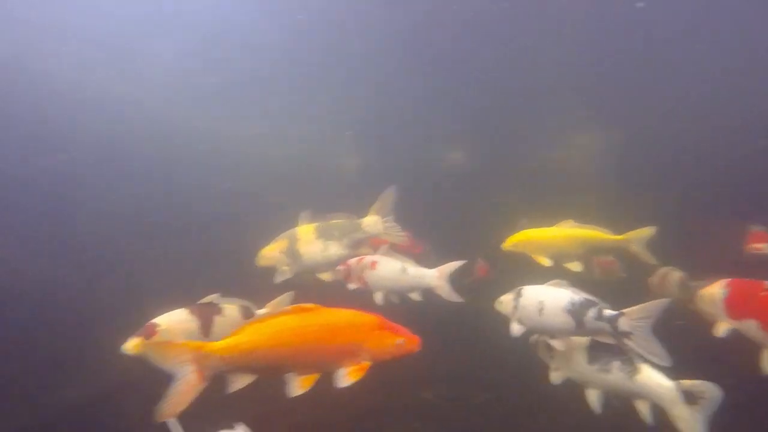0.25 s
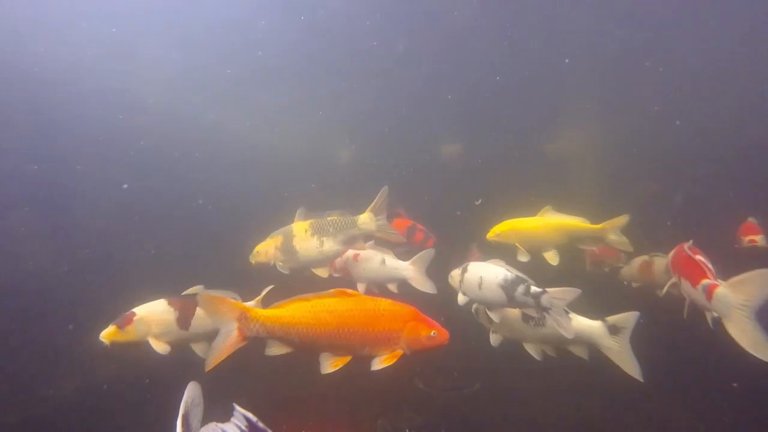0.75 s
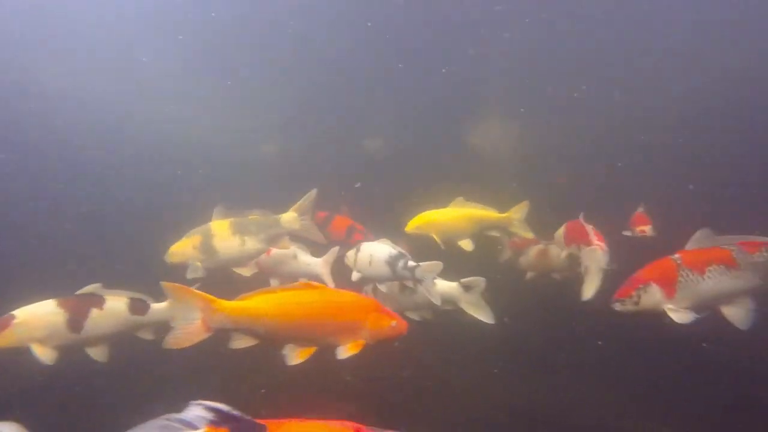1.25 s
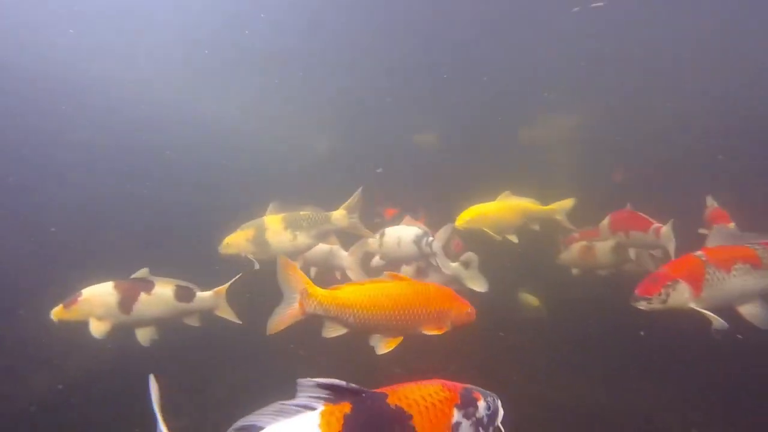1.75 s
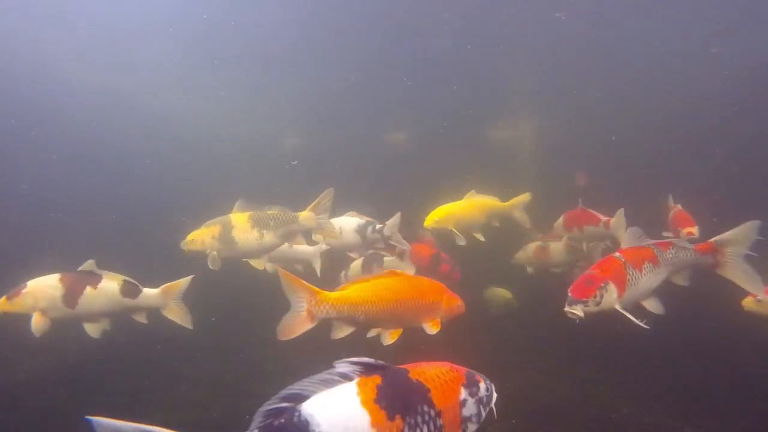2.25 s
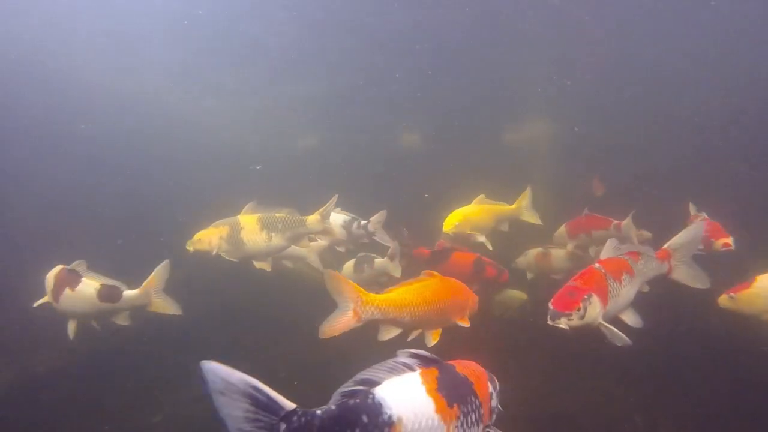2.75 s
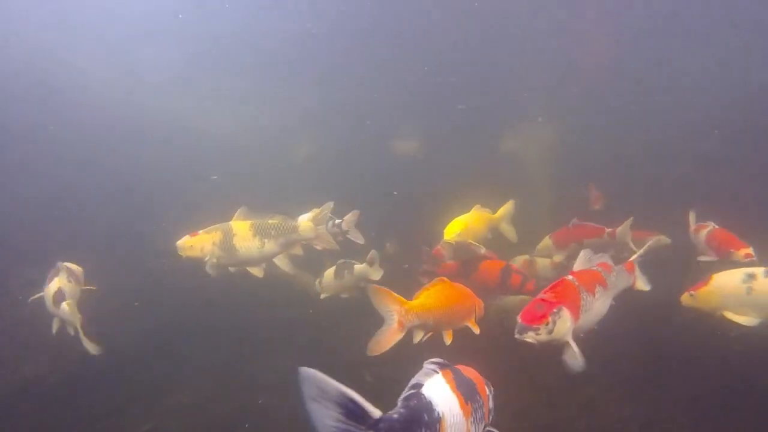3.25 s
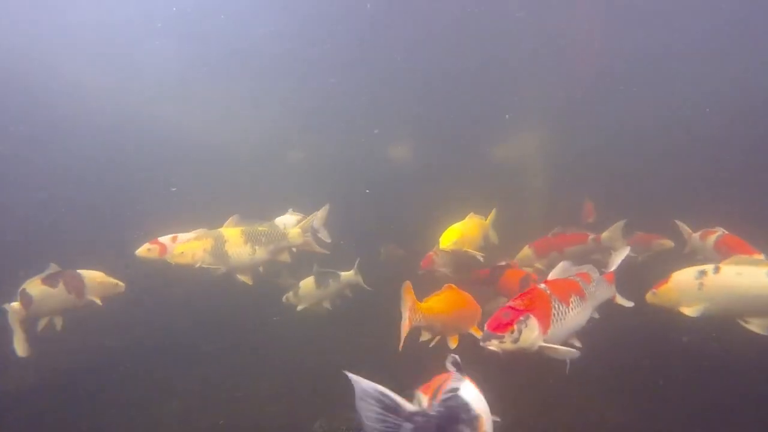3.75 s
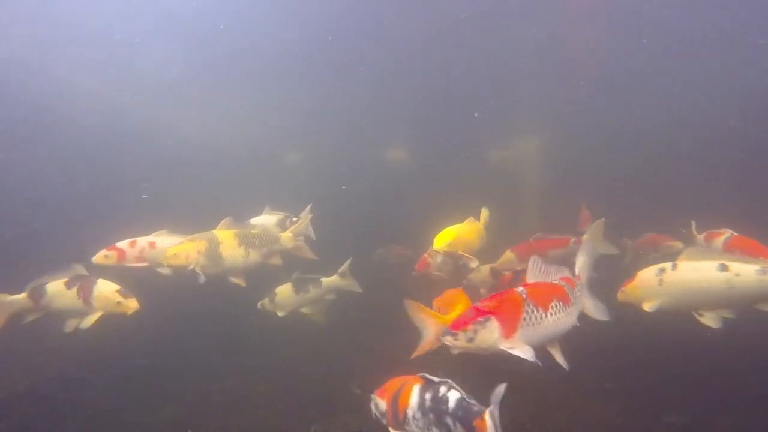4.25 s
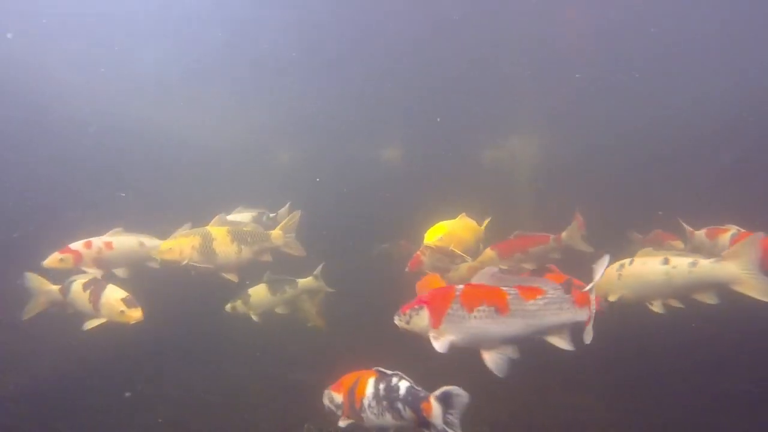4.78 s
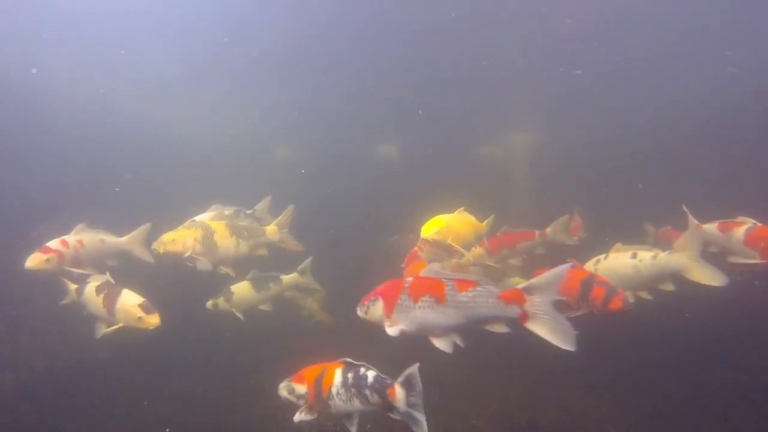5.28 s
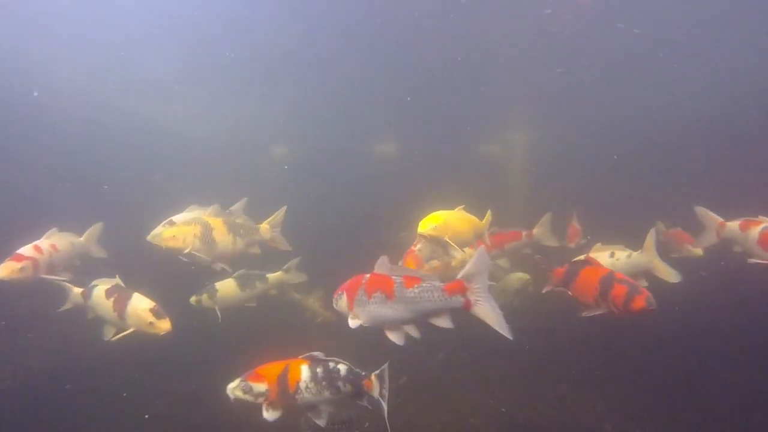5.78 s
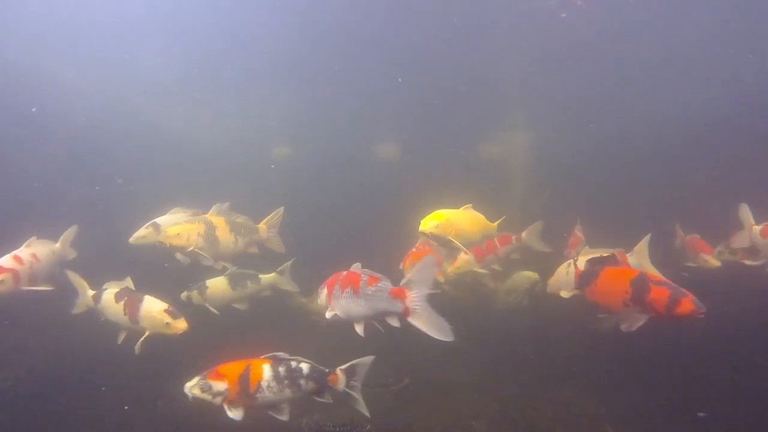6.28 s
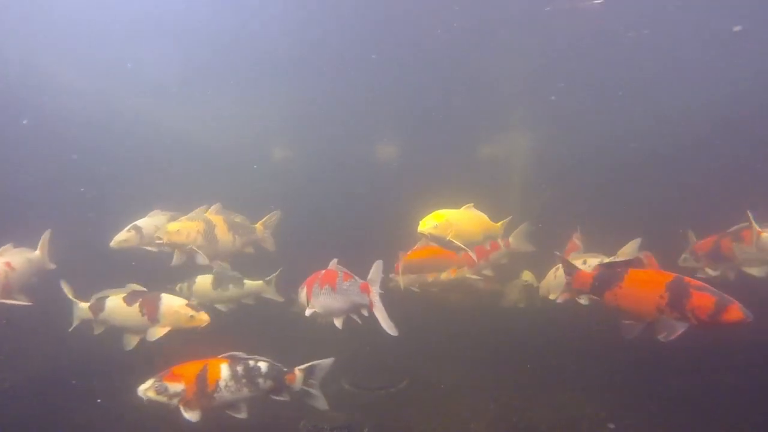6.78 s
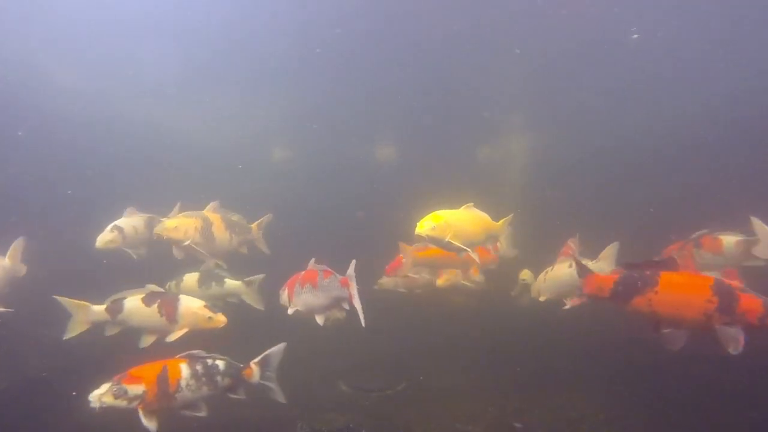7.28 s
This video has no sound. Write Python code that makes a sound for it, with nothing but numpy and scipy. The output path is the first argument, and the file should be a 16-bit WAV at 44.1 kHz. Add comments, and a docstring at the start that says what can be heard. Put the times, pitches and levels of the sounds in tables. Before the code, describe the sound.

Heard from inside a sealed case underwater in a koi pond: a hand moves the mount, giving deep sway, shudder and hard muffled knocks for about two and a half seconds. Then it lets go, leaving low watery rumble, a pump's mains hum, frequent hollow bubble plops, deeper filter gulps and tiny dry ticks. The fish make no distinct sound.

```python
"""Knocks, sway and shudder open the scene as a hand shifts a sealed case on its mount in a fish pond; after
under three seconds the hand lets go and rumble, mains hum, bubbles and small ticks carry on, heard inside the case.
Water is filtered noise, some of it through resonances of case and pond; the hum and a faint whine are steady sines.
Bubbles and knocks are decaying sines, ticks are short noise bursts, and the moving mount is narrow noise that
follows the hand."""
import sys
import numpy as np
from scipy import signal
from scipy.fft import next_fast_len
from scipy.io import wavfile

SR = 44100
rng = np.random.default_rng(int(sys.argv[2]) if len(sys.argv) > 2 else 0)


def bounce(signal):
    """Save signal as a 16-bit WAV file at the path given by the first command-line argument."""
    frames = np.transpose(np.atleast_2d(signal))
    limited = np.clip(frames, -1, 1)
    pcm = np.round(limited * 32767).astype(np.int16)
    wavfile.write(sys.argv[1], SR, pcm)


N = 332072

# Spectrum of the broad water noise. Each row: frequency in Hz, relative density in dB per Hz.
WATER_SPECTRUM = [(15, -3), (60, -6), (130, -11), (400, -21), (1200, -37.5), (1650, -64), (3000, -44),
                  (5000, -49.5), (9500, -56.5), (10500, -70), (12500, -61), (14000, -77)]
WATER_RMS_DB = -41

# Resonances of case and pond, excited by the water.
# Each row: centre in Hz, width in Hz, rms level in dB before it wavers.
WATER_RESONANCES = [(26.5, 13, -63), (96, 35, -41.5), (170.2, 45, -43.5), (217.7, 32, -51),
                    (307, 65, -53.5), (504, 94, -53), (596.7, 115, -43.5), (818.2, 61, -54.5),
                    (938, 175, -58), (1320.5, 66, -62.5), (1470, 190, -65.5), (1861, 170, -58),
                    (2014, 108, -59.5), (2346, 470, -68.5), (3480, 520, -75), (5725, 300, -80)]
GURGLE_JOLTS_PER_S, GURGLE_SHARE = 100, 0.42
PITCH_WANDER_SHARE, PITCH_WANDER_TOP_HZ = .02, 1100

# Hum of the pump motor. Each row: multiple of the mains frequency, rms level in dB before it wavers.
HUM_HARMONICS = [(2, -55), (4, -56), (6, -65), (8, -63), (9, -59), (10, -50), (11, -62)]
MAINS_HZ = 59.98

# Faint electronic whine: a list of tone frequencies in Hz.
WHINE_TONES_HZ = [9590, 9620, 9650]
# Levels of those tones. Each row: early rms level in dB, late rms level in dB.
WHINE_LEVELS = [(-94, -104), (-104, -92), (-86, -93)]
WHINE_SHIFT_S = 3.2

# Single clear bubbles. Each row: start in seconds, level in dB before rise and decay, pitch in Hz.
CLEAR_BUBBLES = [(0.1033, -27.5, 612), (0.1172, -38, 834), (0.144, -26, 581), (0.282, -22, 628),
                 (0.3615, -26, 599), (0.3987, -28, 580), (0.4809, -46.5, 3550), (0.618, -27, 598),
                 (0.735, -43, 2080), (0.8196, -50, 5870), (0.8339, -28.5, 608), (0.864, -57, 3970),
                 (0.882, -38, 2050), (0.9708, -24, 547), (1.1479, -58, 6000), (1.2796, -48, 6720),
                 (1.8268, -18.5, 574), (1.8486, -23, 585), (1.8653, -29.5, 833), (2.032, -22.5, 586),
                 (2.0806, -33.5, 1910), (2.2004, -27, 601), (2.2265, -32, 645), (2.2843, -52, 3560),
                 (2.5926, -37, 2600), (2.9049, -23.5, 637), (2.9937, -34.5, 855), (3.0577, -37, 2550),
                 (3.0705, -31, 916), (3.309, -34, 827), (3.889, -30.5, 599), (3.9078, -27, 629),
                 (4.0319, -33, 988), (4.187, -34.5, 855), (4.2653, -53, 3400), (4.3256, -39.5, 1805),
                 (4.3292, -29, 662), (4.3646, -23.5, 659), (4.4168, -23, 555), (4.452, -33, 834),
                 (4.4723, -30, 643), (4.4993, -44, 3470), (4.502, -45, 3130), (4.7013, -48.5, 3630),
                 (4.701, -27, 599), (4.72, -24.5, 624), (4.753, -22.5, 631), (4.9133, -31, 708),
                 (4.9857, -35, 618), (5.0606, -27, 575), (5.157, -33, 626), (5.1853, -44, 3570),
                 (5.1885, -48, 3930), (5.277, -46, 620), (5.5387, -30.5, 1975), (5.559, -53, 3500),
                 (5.6751, -49, 3500), (5.903, -27, 600), (5.9394, -28, 567), (5.972, -59, 3800),
                 (6.0273, -53, 4700), (6.0493, -47, 3300), (6.0591, -23.5, 581), (6.1861, -30, 617),
                 (6.1929, -26.5, 1906), (6.309, -28, 605), (6.4067, -22, 620), (6.4483, -48, 2850),
                 (6.5825, -49, 3400), (6.7144, -27, 562), (6.9408, -31.5, 1860), (6.9742, -32.5, 1875),
                 (7.1009, -43.5, 2420), (7.1537, -49, 2520), (7.275, -23, 577), (7.476, -29, 807),
                 (7.514, -41.5, 3540)]
# Cycles a bubble rings while falling 60 dB: at 600 Hz, and the change for each octave above or below.
BUBBLE_CYCLES, CYCLES_PER_OCTAVE = 46, 20
FIZZ_PER_S, FIZZ_DB = 70, -69.5  # level before the tilt with pitch and the spread of sizes

# Big bubbles gulping out of the filter.
# Each row: start in seconds, level in dB before rise and decay, pitch in Hz.
FILTER_GULPS = [(2.8, -36, 96.5), (3.029, -28, 106.5), (3.331, -29, 100), (3.502, -23, 169),
                (3.565, -20.5, 171), (3.724, -20.5, 97.7), (3.846, -36, 99), (4.205, -27.5, 103),
                (4.645, -23, 101), (4.69, -25.5, 65), (5.272, -24, 93), (5.715, -25, 107),
                (6.142, -24, 171), (6.55, -29, 92.8), (6.816, -24, 175), (7.283, -39, 91)]
GULP_CYCLES, GULP_RISE_CYCLES = 21, 1.05

# Dry ticks without a pitch. Each row: start in seconds, noise level in dB before rise, decay and filter,
# centre in Hz, width in octaves, time to fall 60 dB in seconds.
DRY_TICKS = [(0.05, -55, 3500, 0.28, 0.039), (0.165, -51, 3500, .3, .025), (0.3143, -44.5, 3200, .3, 0.07),
             (0.408, -50, 2500, .25, 0.033), (0.678, -58, 6900, .4, .015), (2.5835, -56, 7000, .4, .015),
             (2.7892, -45, 4620, 0.48, 0.017), (2.9288, -50, 5900, .5, .015),
             (3.353, -44, 4370, 0.61, 0.025), (4.108, -38.5, 2680, 0.34, 0.039),
             (4.246, -48, 4300, .3, .02), (4.4239, -38, 2520, 0.29, 0.037), (5.549, -52, 6400, .4, .015),
             (5.5853, -50, 6200, 0.52, .015), (5.922, -56, 7500, .3, .015), (5.95, -46, 3000, .5, 0.022),
             (6.1929, -44, 2500, 0.47, 0.022), (6.34, -57, 6800, .5, .015), (6.563, -42, 2900, 0.36, 0.038),
             (6.9764, -38, 2400, 0.36, 0.038)]
TICK_RISE_S = 0.00057
CRACKLE_PER_S, CRACKLE_DB, CRACKLE_T60_S = 32, -63, .015  # level before the spread of sizes

# The hand on the mount. Each row: time in seconds, slow sway in dB, case shudder in dB.
HAND_MOTION = [(0.0,-50,-44), (0.07,-22.5,-55), (0.25,-38,-26), (0.3,-22,-45), (0.39,-32,-44),
               (0.419,-21.5,-24), (0.54,-23.5,-47), (0.6,-50,-62), (0.65,-30.5,-49), (0.7,-45,-46.5),
               (0.77,-40,-58), (0.81,-21.5,-44), (0.89,-34,-38.5), (1.13,-31,-35.5), (1.16,-24,-45),
               (1.19,-25,-33), (1.27,-20.5,-37), (1.32,-24.5,-45), (1.38,-22,-27), (1.45,-33,-29),
               (1.55,-32,-29), (1.58,-31.5,-41), (1.68,-34,-26), (1.71,-29,-48), (1.82,-42,-46),
               (1.89,-28,-53), (1.96,-42,-50), (2.02,-29,-54), (2.16,-46,-43), (2.22,-35.5,-44),
               (2.5,-35,-35.5), (2.57,-55,-52), (2.7,-55,-52)]
SWAY_HZ, SWAY_WIDTH_HZ = 25, 20
SWAY_EVENNESS = .6  # 0 swells at random, 1 swings almost evenly
SHUDDER_HZ, SHUDDER_WIDTH_HZ = 102.3, 33
LET_GO_S = 0.22

# The case slides in its clamp around hard knocks.
# Each row: start in seconds, length in seconds, rms level in dB before it flickers.
CLAMP_RUBS = [(0.247, 0.2, -63.5), (0.81, 0.21, -60.5), (1.32, 0.227, -60)]
RUB_HZ, RUB_WIDTH_HZ, RUB_EDGE_S = 2300, 550, 0.026

# Knocks on the case. Each row: start in seconds, then drive of the thump, knock and crack modes in dB,
# share of the free ring time that the grip leaves.
CASE_KNOCKS = [(0.054, -21, -39, -77, .8), (0.2015, -30, -50, -55, 1.), (0.2075, -20, -45, -66, .7),
               (0.2375, -16, -27, -52, .8), (0.2445, -9, -13, -37, .9), (0.2555, -17, -18, -47, .8),
               (0.471, -19.5, -30, -71, .9), (0.625, -25.5, -28.5, -65, .9), (0.7822, -26, -27, -62, .8),
               (0.7856, -9, -13.5, -34.5, .9), (0.837, -21, -31, -60, .6), (1.138, -20.5, -46, -70, .9),
               (1.224, -19.5, -36, -62, .9), (1.259, -20.5, -38, -70, .9), (1.3392, -24, -32, -64, .8),
               (1.3413, -5, -14, -36, .6), (1.504, -22.5, -38, -74, .9), (1.696, -19.5, -45, -65, .9),
               (2.0036, -9.5, -13, -53, .6), (2.0125, -21, -22, -64, .5), (2.021, -14, -25, -62, .45)]
# What the case rings with. Each row: pitch in Hz, level in dB added to the drive,
# time to fall 60 dB in seconds, rise in seconds.
CASE_RING = [(32.8, -16, 0.52, .0012), (85, -2.5, 0.089, 0.00075), (110.1, 1.5, 0.12, 0.00097),
             (170, -3, 0.023, 0.0024), (250, 1, 0.044, .0008), (375, 6, 0.016, 0.0015),
             (458, 0.5, 0.032, 0.0014), (529, 6, 0.024, 0.00099), (663, 6.5, .021, 0.0012),
             (760, -23.5, 0.01, 0.0021), (1530, 12.5, 0.018, 0.00071), (1890, 12.5, 0.024, 0.0016),
             (2350, 18, 0.015, 0.0012), (3380, -4, .017, 0.00051)]
THUMP_TOP_HZ, KNOCK_TOP_HZ = 220, 1100
GRIT_DB, GRIT_RISE_S, GRIT_T60_S = -6, 0.011, .045

MIC_LOW_HZ, CUTOFF_HZ = 14, 14500


def from_db(db):
    """Turns decibels into an amplitude factor."""
    return 10 ** (np.asarray(db) / 20)


def rms_one(x):
    """Scales a signal to rms 1."""
    return x / np.sqrt(np.mean(x ** 2) + 1e-20)


def drift(rate_hz):
    """Slow random wander of spread 1: noise at a fortieth of the sample rate through two equal low-pass poles."""
    pole = np.exp(-80 * np.pi * rate_hz / SR)
    noise = rng.standard_normal(N // 40 + 2002)
    slow = signal.lfilter([1], [1, -2 * pole, pole * pole], noise)[2000:]
    return np.interp(np.arange(N) / 40, np.arange(len(slow)), rms_one(slow))


def filtered(x, order, hz, kind="low"):
    """Butterworth filter."""
    return signal.sosfilt(signal.butter(order, hz, kind, fs=SR, output="sos"), x)


def resonate(x, hz, width_hz):
    """Two-pole band-pass."""
    radius = np.exp(-np.pi * width_hz / SR)
    poles = [1, -2 * radius * np.cos(2 * np.pi * hz / SR), radius * radius]
    return signal.lfilter([1, 0, -1], poles, x)


def narrow_noise(hz, width_hz, jolt_share=0., wander=0.):
    """Noise and sparse random jolts, twice through one resonance so the skirts stay dark; rms 1."""
    length = N + 2 * SR
    jolts = (rng.random(length) < GURGLE_JOLTS_PER_S / SR) * rng.standard_normal(length)
    smooth = np.sqrt(1 - jolt_share) * rng.standard_normal(length)
    drive = smooth + np.sqrt(jolt_share) * rms_one(jolts)
    still = resonate(resonate(drive, hz, width_hz), hz, width_hz)[SR:]
    # Reading at a wavering speed makes the pitch wander.
    position = np.cumsum(1 + wander * drift(2.5))
    return rms_one(np.interp(position, np.arange(N + SR), still))


def add_ring(out, s, level_db, hz, t60, rise_s, glide=0.):
    """Adds a decaying sine; it starts sharp by about 2.2 times glide and falls to pitch in a few cycles."""
    start = round(s * SR)
    t = np.arange(max(0, min(int(t60 * SR), N - start))) / SR
    turns = hz * t + glide * 3.8 * (1 - np.exp(-hz * t / 1.7))
    envelope = from_db(level_db - 60 * t / t60) * (1 - np.exp(-t / rise_s)) ** 2
    out[start:start + len(t)] += envelope * np.sin(2 * np.pi * turns)


def water():
    """Broad flow noise in half-octave bands that waver in level, the treble least."""
    out = 0
    edges = 14 * 2 ** np.arange(0, 10.6, .5)
    white = rng.standard_normal((2, N + SR))  # neighbouring bands take turns, so they stay independent
    hz, density_db = np.transpose(WATER_SPECTRUM)
    for k, (low, high) in enumerate(zip(edges, edges[1:])):
        band = filtered(white[k % 2], 2, [low, high], "band")[SR:]
        level_db = np.interp(np.log(low * high) / 2, np.log(hz), density_db)
        waver_db = 3.53 * min(1, 2500 / high) * drift(15.3)
        out = out + band * from_db(level_db + waver_db)
    return from_db(WATER_RMS_DB) * rms_one(out)


def resonances():
    """Gurgling water drives each resonance, so its level bubbles up and down; high ones rush more smoothly."""
    out = np.zeros(N)
    surge = drift(17.0)  # shared by all
    for hz, width_hz, level_db in WATER_RESONANCES:
        jolt_share = GURGLE_SHARE * min(1, 1500 / hz)
        wander = PITCH_WANDER_SHARE * (hz < PITCH_WANDER_TOP_HZ)
        waver_db = 0.5 * surge + 1.1 * drift(20.5)
        out += narrow_noise(hz, width_hz, jolt_share, wander) * from_db(level_db + waver_db)
    return out


def tone(hz):
    """Steady sine of rms 1 from a random phase."""
    return np.sqrt(2) * np.sin(2 * np.pi * (hz * np.arange(N) / SR + rng.random()))


def motor_hum():
    """Mains multiples from the pump motor; each wavers as its paths through the water change."""
    return sum(from_db(db + 0.63 * drift(4.6)) * tone(multiple * MAINS_HZ)
               for multiple, db in HUM_HARMONICS)


def electronic_whine():
    """Faint high steady tones whose levels step once."""
    early = np.arange(N) / SR < WHINE_SHIFT_S
    return sum(from_db(np.where(early, early_db, late_db)) * tone(hz)
               for hz, (early_db, late_db) in zip(WHINE_TONES_HZ, WHINE_LEVELS))


def bubbles():
    """Each clear bubble rings with a short snap as it pinches off and a neighbour of slightly other size."""
    out = np.zeros(N)
    for s, level_db, hz in CLEAR_BUBBLES:
        later, other = rng.random(2)
        octaves = np.log2(hz / 600)
        t60 = (BUBBLE_CYCLES + CYCLES_PER_OCTAVE * octaves) / hz
        add_ring(out, s, level_db, hz, t60, rise_s=1.1 / hz, glide=0.015 * (hz / 3000) ** 2)
        # The neighbour follows a few cycles later.
        neighbour_s, neighbour_hz = s + (3 + 6 * later) / hz, hz * (.93 + .14 * other)
        add_ring(out, neighbour_s, level_db - 5, neighbour_hz, t60, rise_s=1.6 / hz)
        # The snap is relatively louder in small, high bubbles.
        add_ring(out, s + .6 / hz, level_db - 10 + 4 * octaves, 1.06 * hz, 12 / hz, rise_s=0.5 / hz)
    return out


def fizz():
    """A random scatter of faint bubbles, the higher ones softer and a few of them standing out."""
    out = np.zeros(N)
    for when, pitch, size in rng.random((int(FIZZ_PER_S * N / SR), 3)):
        hz = 800 * 11 ** pitch
        level_db = FIZZ_DB - 11.5 * np.log2(hz / 3000) - 1.9 * np.log(size + 0.012)
        add_ring(out, when * (N - 2) / SR, level_db, hz, 55 / hz, rise_s=0.87 / hz, glide=0.12 * hz / 3000)
    return out


def gulps():
    """Each big bubble swells, rings a few cycles and dies."""
    out = np.zeros(N)
    for s, level_db, hz in FILTER_GULPS:
        add_ring(out, s, level_db, hz, GULP_CYCLES / hz, rise_s=GULP_RISE_CYCLES / hz)
    return out


def ticks():
    """Each tick is a quickly dying noise burst in one band; fainter ones crackle at random in the treble."""
    crackle = []
    for when, pitch, size in rng.random((int(CRACKLE_PER_S * N / SR), 3)):
        level_db = CRACKLE_DB - 3 * np.log(size + .02)
        crackle.append((when * N / SR, level_db, 2400 * 3.4 ** pitch, .5, CRACKLE_T60_S))
    out, t = np.zeros(N + 3000), np.arange(3000) / SR
    for s, level_db, hz, octaves, t60 in DRY_TICKS + crackle:
        envelope = from_db(level_db - 60 * t / t60) * (1 - np.exp(-t / TICK_RISE_S))
        burst = rng.standard_normal(len(t)) * envelope
        edges = hz * 2 ** (octaves * np.array([-.5, .5]))
        start = round(s * SR)
        out[start:start + len(t)] += 2 * filtered(burst, 2, edges, "band")
    return out[:N]


def handling():
    """Sway and shudder of the mount follow the hand and die away as it lets go."""
    s, sway_db, shudder_db = np.transpose(HAND_MOTION)
    t = np.arange(N) / SR
    held = np.clip((s[-1] - t) / LET_GO_S, 0, 1)
    swing = narrow_noise(SWAY_HZ, SWAY_WIDTH_HZ)
    # Dividing by part of its own envelope evens out the swing.
    swell = np.abs(signal.hilbert(swing, next_fast_len(N)))[:N] + .1
    sway = from_db(np.interp(t, s, sway_db)) * rms_one(swing / swell ** SWAY_EVENNESS)
    shudder_level = from_db(np.interp(t, s, shudder_db) + 1.5 * drift(12))
    shudder = shudder_level * narrow_noise(SHUDDER_HZ, SHUDDER_WIDTH_HZ)
    return held * (sway + shudder)


def rubs():
    """The case sliding in its clamp: flickering narrow noise that swells, holds and stops."""
    t, sliding = np.arange(N) / SR, np.zeros(N)
    for start, length, db in CLAMP_RUBS:
        from_edge = np.minimum(t - start, start + length - t)
        sliding += from_db(db) * np.clip(from_edge / RUB_EDGE_S, 0, 1)
    return sliding * from_db(2.0 * drift(25)) * narrow_noise(RUB_HZ, RUB_WIDTH_HZ)


def knocks():
    """Each blow rings the case modes, harder contact the higher ones more, and the parts grate briefly."""
    out, t = np.zeros(N), np.arange(N) / SR
    low_grit = filtered(narrow_noise(600, 900), 4, 820)
    high_grit = narrow_noise(2600, 1600)
    for s, thump_db, knock_db, crack_db, ring_share in CASE_KNOCKS:
        for hz, mode_db, t60, rise_s in CASE_RING:
            if hz < THUMP_TOP_HZ:
                blow_db = thump_db
            elif hz < KNOCK_TOP_HZ:
                blow_db = knock_db
            else:
                blow_db = crack_db
            add_ring(out, s, blow_db + mode_db, hz, t60 * ring_share, rise_s)
        since = np.clip(t - s, 0, 1)
        grating = (1 - np.exp(-since / GRIT_RISE_S)) * from_db(GRIT_DB - 60 * since / GRIT_T60_S)
        out += grating * (from_db(knock_db) * low_grit + from_db(crack_db) * high_grit)
    # The wall passes no sharp edge; the sign makes the pressure of the ringing fall first.
    return -filtered(out, 3, 4300)


def scene():
    """Everything reaches the one microphone inside the case."""
    background = water() + resonances() + motor_hum() + electronic_whine()
    pond_events = bubbles() + fizz() + gulps() + ticks()
    hand = handling() + rubs() + knocks()
    return (background + pond_events + hand)[None]


def record(dry):
    """The microphone loses the deepest bass; the top is cut."""
    heard = filtered(dry, 2, MIC_LOW_HZ, "high")
    return signal.sosfilt(signal.cheby2(20, 50, CUTOFF_HZ, fs=SR, output="sos"), heard)


dry = scene()
out = record(dry)
bounce(out)
```